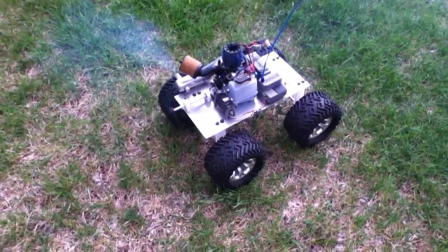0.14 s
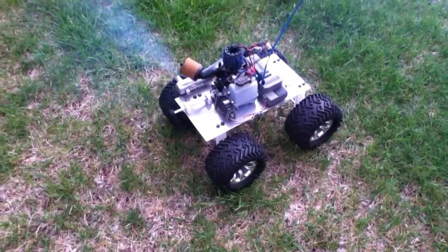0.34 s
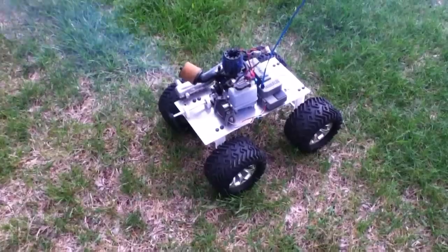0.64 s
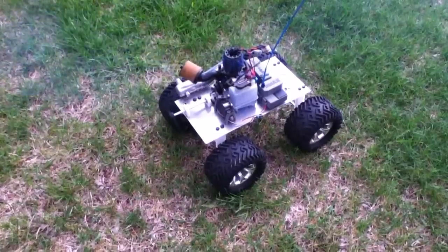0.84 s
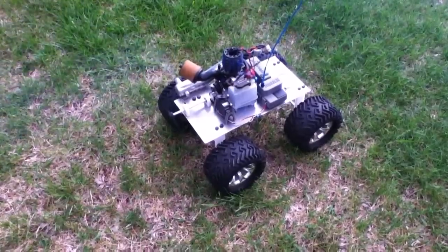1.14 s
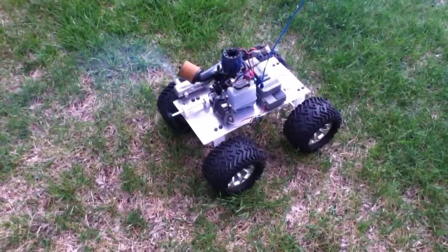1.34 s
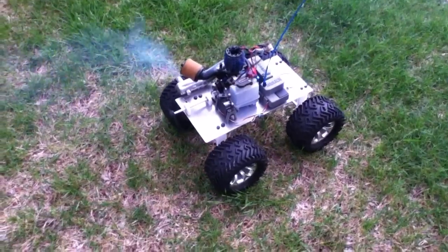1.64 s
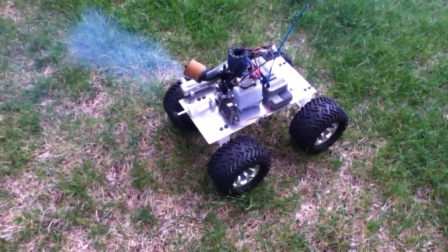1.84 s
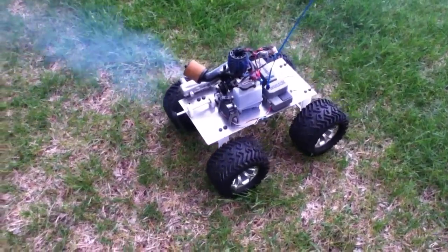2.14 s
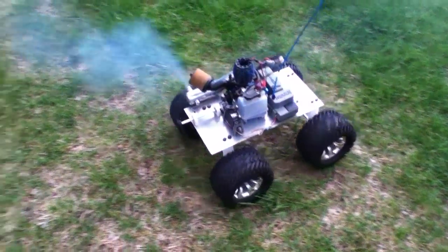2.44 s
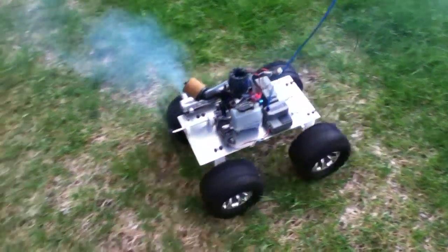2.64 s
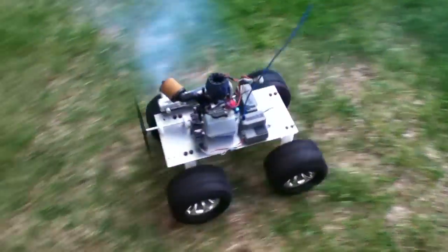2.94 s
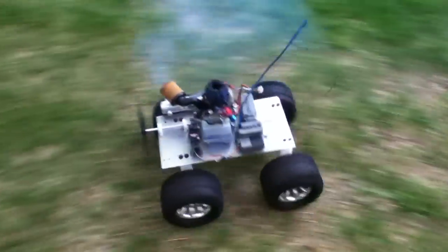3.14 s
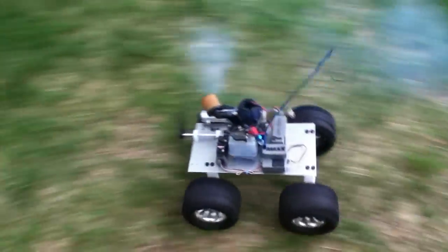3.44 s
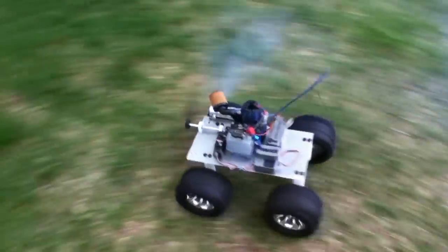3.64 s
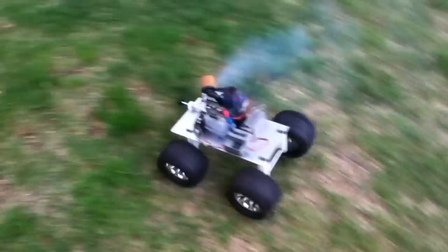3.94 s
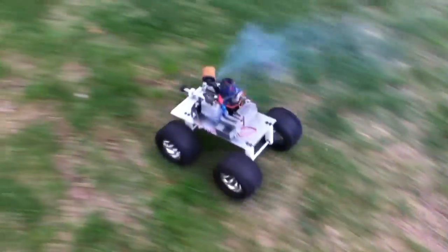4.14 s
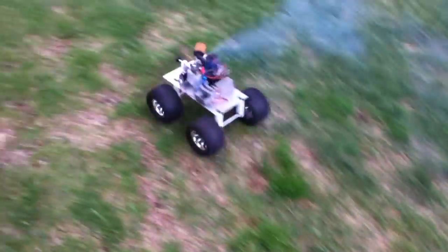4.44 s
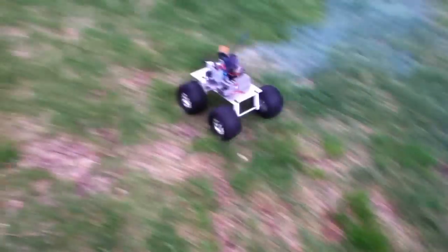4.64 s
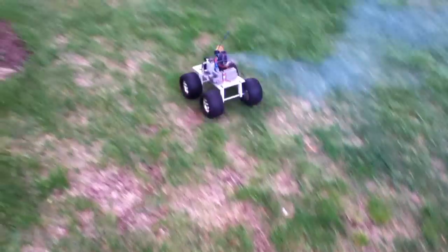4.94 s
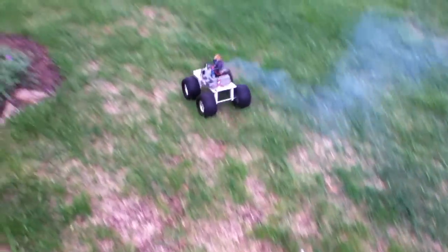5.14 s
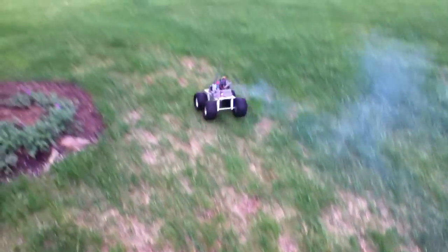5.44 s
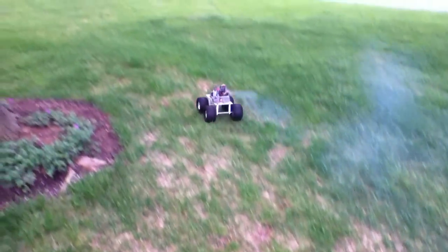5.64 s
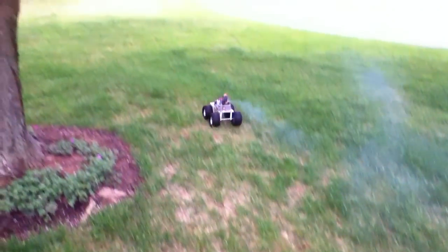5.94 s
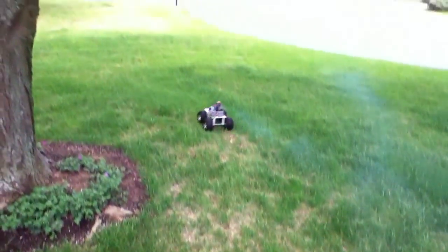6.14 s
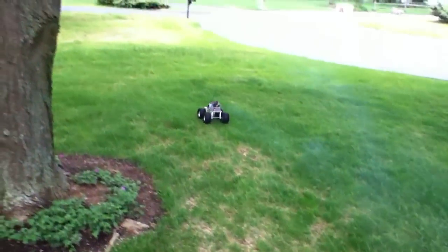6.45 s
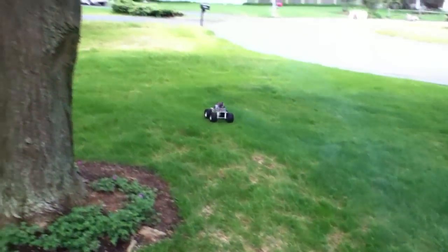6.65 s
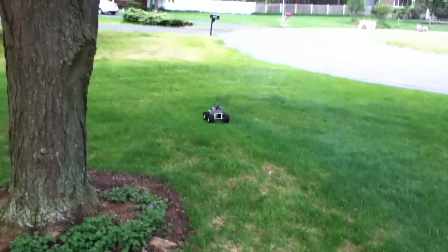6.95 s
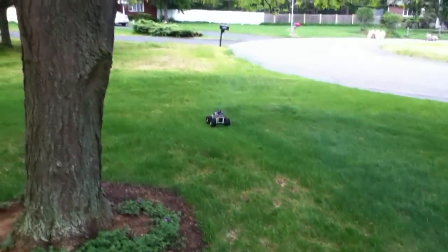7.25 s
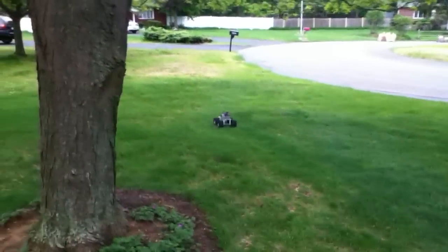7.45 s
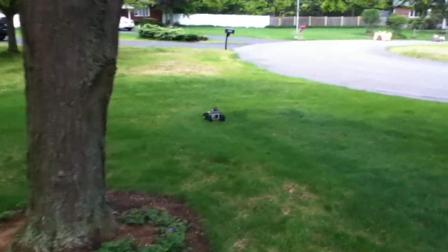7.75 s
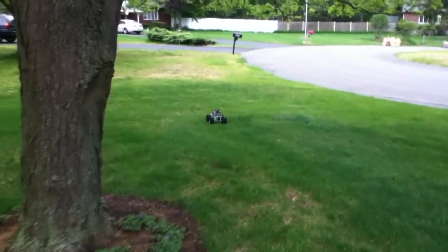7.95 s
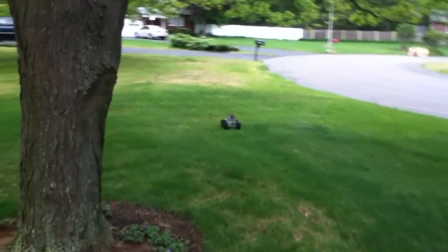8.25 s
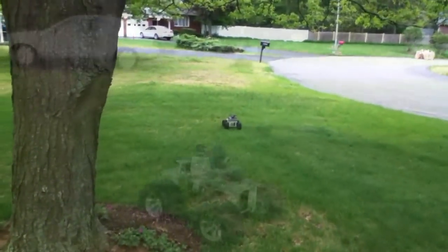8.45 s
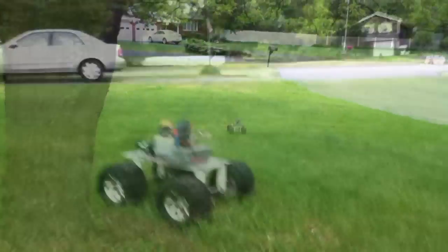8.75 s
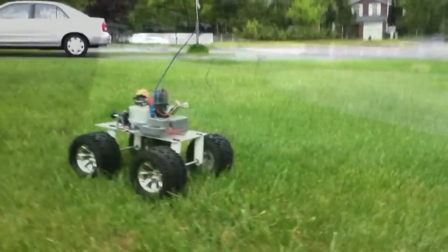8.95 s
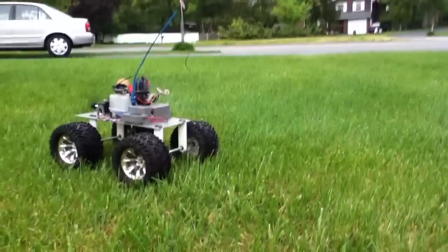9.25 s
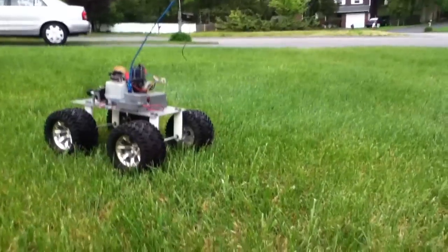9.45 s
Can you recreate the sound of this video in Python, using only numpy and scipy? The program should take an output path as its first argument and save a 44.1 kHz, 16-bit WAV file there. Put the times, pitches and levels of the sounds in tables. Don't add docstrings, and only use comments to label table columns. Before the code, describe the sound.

A high, nasal engine buzz with hissing gas and trembling metal plates starts close by, dips briefly, then climbs as the small model car pulls away over bumpy grass. The throttle snaps shut and a faint, uneven idle putters in the distance. A smooth fade brings a nearer view of the idle, clattering and uneven, over low outdoor rumble, essentially mono.

```python
import sys
import numpy as np
from scipy import signal
from scipy.fft import rfft, irfft, next_fast_len
from scipy.io import wavfile
from scipy.ndimage import uniform_filter1d

SR = 44100
rng = np.random.default_rng(int(sys.argv[2]) if len(sys.argv) > 2 else 0)


def linear_from_db(decibels):
    return 10 ** (np.asarray(decibels, float) / 20)


def dump_mix(stems):
    frames = np.atleast_2d(stems).T
    limited = np.clip(frames, -1, 1)
    pcm = np.round(limited * 32767).astype(np.int16)
    wavfile.write(sys.argv[1], SR, pcm)


N = 423360
TIME_S = np.arange(N) / SR

# time in seconds, open share (0 to 1).
THROTTLE = [
    (6.62, 1),
    (6.7, 0.56),
]
# time in seconds, then rasp, puff and hiss in dB
# over the rattle, and air in dB over the hiss.
ASPECTS = [(1.8, 1.5, -11, -9.5, -5), (2.8, -1, -12, -11, -7), (3.7, -3, -10.5, -9.5, -14),
           (4.3, -1.5, -10, -8, -19), (5.1, 0.5, -13.5, -8, -18), (6, 3.5, -14, -9, -18),
           (7.7, 3.5, -11, -7.5, -21), (9.2, 10, -13.5, -5, -16)]
# time in seconds, order 1 in dB, pipe peak over it in dB, pipe peak in Hz.
CLOSE_EXHAUST = [(8.5, -39.5, -7, 1480), (8.9, -31.5, -4.5, 1598), (9.2, -26.5, -3, 1840),
                 (9.6, -26.5, -6, 1896)]


def unit(x):
    return x / np.sqrt(np.mean(x ** 2) + 1e-20)


def along(points, hz):
    f, v = np.transpose(points)
    return np.interp(np.log(hz + 1), np.log(f + 1), v)


def curves(rows):
    s, *cols = np.transpose(rows)
    return [np.interp(TIME_S, s, c) for c in cols]


def wobble(rate, at=None):
    knots = rng.standard_normal(int(N * rate / SR) + 4)
    where = np.arange(N) if at is None else at
    return np.interp(where * rate / SR, np.arange(len(knots)), knots)


def coloured(x, level_db):
    m = next_fast_len(N + 8192)
    gain = linear_from_db(level_db(np.fft.rfftfreq(m, 1 / SR)))
    return unit(irfft(rfft(x, m) * gain, m)[:N])


def tinted(x, points):
    return coloured(x, lambda hz: along(points, hz))


def blend(x, share, first, second):
    return share * tinted(x, first) + (1 - share) * tinted(x, second)


def patch_field(shape, high, wide):
    smooth = uniform_filter1d(rng.standard_normal(shape), size=high, axis=0)
    return unit(uniform_filter1d(smooth, size=wide, axis=1))


def patchy(depth_db):
    z = signal.stft(rng.standard_normal(N + 512), nperseg=512)[2]
    z = z * linear_from_db(depth_db * patch_field(z.shape, 4, 16))
    return signal.istft(z, nperseg=512)[1][:N]


def shut():
    return np.interp(TIME_S, np.transpose(THROTTLE)[0], (0, 1))


def bumps(lag_s, size):
    # time of the deepest point in seconds, crank sag in Hz, length in seconds, drop of the noise in
    # dB (negative: a rise).
    turf = [(.19, 16, 0.19, -1), (0.362, 16, .09, -1), (0.52, 13, 0.13, -1.5), (0.917, 4, 0.097, 3),
            (1.43, 19, 0.13, -0.5), (1.589, 18, 0.22, 0), (1.746, 14, .06, 0.5), (1.93, 14, .09, -1.5),
            (2.049, 17, 0.098, 2.5), (2.137, 8, .08, 1), (2.351, 6, .12, -1), (2.451, 6, 0.084, -0.5),
            (2.871, 9, 0.13, 1.5), (3.089, 10, 0.13, -0.5), (3.282, 12, 0.17, 1.5), (3.446, 12, .16, 2),
            (3.678, 14, .18, 1.5), (4.493, 12, 0.2, 0.5), (4.67, 7, 0.13, 0.5), (5.001, 12, 0.15, 1),
            (5.13, 3, .14, 1.5), (5.291, 11, .18, -0.5), (5.577, 24, .3, 1.5), (5.759, 6, .12, 1),
            (5.96, 7, .14, 1.5), (6.059, 0, .1, 1.5), (6.249, 16, 0.23, 2), (6.439, 13, 0.082, 1),
            (6.569, 11, 0.11, 0.5), (7.397, 12, .1, 1.5), (8.991, 11, 0.065, 0.5)]
    sag_share = .32
    t = np.arange(0, N, 32) / SR - lag_s
    dips = 0
    for row in turf:
        corners_s = (-sag_share * row[2], 0, (1 - sag_share) * row[2])
        dips = dips + np.interp(t - row[0], corners_s, (0, row[size], 0))
    return np.repeat(dips, 32)[:N]


def crank(rows, exhaust, odd_idle_db, span_s):
    # frequency in Hz, gain in dB.
    outlet = [(900, 9), (1120, 1), (1250, 0), (1950, 1), (2200, -4), (2450, -1), (2700, -9), (3250, 7),
              (3800, 1), (4400, 9), (5100, 5), (5700, 8), (6400, -6)]
    # time in seconds, notch in Hz, depth in dB.
    ground = [(.2, 700, 2), (.42, 640, 0), (.6, 705, 3), (.75, 700, 11), (1.3, 696.7, 0.5),
              (2.6, 1001, 0.5), (3.8, 1050, 9), (4.5, 952, 10), (4.95, 730, 15.5), (5.5, 700, 19),
              (5.75, 705, 15), (6.05, 800, 13.5), (6.45, 839.5, 23), (6.7, 699, 1.5), (8.65, 500, 2.5),
              (8.9, 480.6, 12.5), (9.6, 481, 8)]
    # time in seconds, gain in dB.
    odd_orders = [(.6, 4.5), (.75, 1.5), (1.3, 2.5), (3.1, 3), (4.1, -1), (5.4, 2), (5.8, -1), (6.6, 3)]
    notch_width_hz = 275
    skirt = .11

    live = np.arange(round(span_s[0] * SR), min(round(span_s[1] * SR), N))
    slow = live[::32]
    turns = curves(rows)[0] - bumps(0, size=1)
    unsteady = 1.7 ** np.clip((345 - turns) / (345 - 230), 0, 1)
    turns = turns * (1 + unsteady * (.006 * wobble(30) + .007 * wobble(150)))
    angle = 2 * np.pi * np.cumsum(turns) / SR

    tracks = curves(exhaust) + curves(ground) + curves(odd_orders) + [turns, shut()]
    first_db, facing_db, peak_hz, notch_hz, notch_db, odd_db, hz, idle = np.array(tracks)[:, slow]
    low = {1: first_db}
    for k, over_first_db, soft_db in ((2, 4, -10), (3, 7.5, -16)):
        echo_db = notch_db / (1 + ((k * hz - notch_hz) / notch_width_hz) ** 2)
        low[k] = first_db + over_first_db + idle * soft_db - echo_db
    width_hz = 215 + 100 * idle
    tone = np.zeros(N)
    for k in range(1, 19):
        detune = (k * hz - peak_hz) / width_hz
        ring_power = linear_from_db(2 * facing_db) / (1 + detune ** 2) + skirt * (1 - .93 * idle)
        favour_db = (odd_db * (k < 6) + odd_idle_db * idle) * (k % 2 * 2 - 1)
        passed_db = first_db + 10 * np.log10(ring_power) + along(outlet, k * hz) + favour_db
        flutter_db = (1.1 + min(.05 * k, .3)) * wobble(40, slow)
        lag = np.arctan(detune) + np.pi / 2 + .6 * wobble(8, slow)
        size = np.interp(live, slow, linear_from_db(low.get(k, passed_db) + flutter_db))
        tone[live] -= np.sqrt(2) * size * np.cos(k * angle[live] - np.interp(live, slow, lag))
    return angle, tone


def four_stroking(angle):
    # order (multiple of the turning speed), level in dB over order 1.
    quarters = [(.75, -22), (1.25, -17), (1.5, -24), (1.75, -19), (2.25, -20)]
    first_db = curves(CLOSE_EXHAUST)[0]
    return sum(np.sqrt(2) * linear_from_db(first_db + db + 1.96 * wobble(15)) * np.sin(k * angle) for k, db in quarters)


def pops(angle, close):
    # frequency in Hz, level in dB.
    click_colour = [(500, -50), (1000, -37), (1800, 0.5), (4000, 7.0), (8000, -9.0), (12000, -48)]
    at = np.flatnonzero(np.diff(np.floor(angle / (2 * np.pi))))
    scatter_db = (5 - 2.5 * close[at]) * np.clip(rng.standard_normal(N // 64)[:len(at)], -2, 2)
    cycle_db = close[at] * np.array([9., -4, -3, 3])[np.arange(len(at)) % 4]
    strength = linear_from_db(scatter_db + cycle_db)
    clicks = np.zeros(N)
    clicks[at] = -strength
    clicks[np.minimum(at + 11, N - 1)] = .6 * close[at] * strength
    return tinted(clicks, click_colour)


def beat(angle, depth_db, lag, shake):
    return linear_from_db(depth_db * np.cos(angle - lag) + shake)


def rasp(angle, shake, close):
    # frequency in Hz, level in dB per Hz.
    usual_rasp = [(600, -92), (900, -10), (1200, -6), (1500, 4.5), (1800, 3), (2100, 1), (2500, -6),
                  (2900, -24.5)]
    high_rasp = [(900, -35), (1300, -6), (1700, 1.5), (1950, 3), (2300, 4.5), (2600, -10), (2900, -23)]
    close_rasp = [(700, -44), (900, -11), (1150, 0), (1600, 0), (2200, 4), (2450, -12), (2900, -22)]
    # time in seconds, share of the high rasp.
    end_on = [(.3, 0.19), (.9, 0), (1.2, 0), (2.15, 0), (2.4, 0.54), (2.9, .1), (3.3, 0.58), (4.1, 0.24),
              (4.35, 0.91), (4.9, 0.68), (5.15, 0.0046), (5.8, 0), (6.15, .7), (6.5, 0.44), (7.4, 0.22),
              (7.9, 0)]
    jet = beat(angle, 0.41, 0.99, shake) * patchy(0.73)
    far = blend(jet, np.clip(curves(end_on)[0], 0, 1), high_rasp, usual_rasp)
    return (close * tinted(jet, close_rasp) + (1 - close) * far) * linear_from_db(-2.5 * close)


def puff(angle, shake, throttle):
    # frequency in Hz, level in dB per Hz.
    open_puff = [(60, -36), (120, -15.5), (200, -12.5), (300, -4.5), (500, 3), (900, 6.5), (1200, 6.5),
                 (2000, -58)]
    idle_puff = [(60, 0), (150, -16), (300, 2.5), (450, -0.5), (620, -13), (850, -28), (1100, 6.5),
                 (2000, -33)]
    return blend(beat(angle, 0.69, 1.0, shake) * patchy(0.7), throttle, open_puff, idle_puff)


def turning(x):
    # frequency in Hz, level in dB per Hz.
    sides = [
        [(1530, -76), (2600, -5.5), (3270, -2), (4550, 0.5), (4980, -3), (5660, 3.5), (6650, -5.5),
         (8010, -1.5), (9300, -7.5), (12100, -70)],
        [(1530, -58), (2600, -11.5), (3270, -4.5), (3900, -8), (4380, -1), (4930, -10), (5760, -3.5),
         (6330, -11.5), (8230, -7), (12100, -25)],
        [(1530, -36), (2600, -6), (3220, -3.5), (3860, 1.5), (4360, -4), (5040, 1.5), (7120, -1.5), (8010, 3),
         (9300, -5.5), (12100, -19)],
        [(1530, -26), (2600, -11), (3050, -2), (5060, -4.5), (5490, -1), (7090, -5.5), (8010, 0), (9300, -1.5),
         (12100, -17)],
        [(1530, -52), (2600, -13), (3150, -4.5), (3800, -3.5), (4070, -8), (5060, -6.5), (6330, -12.5),
         (8010, -5.5), (9300, -20), (12100, -37)],
        [(1530, -24.5), (2600, 0.5), (3560, -1), (4550, 1), (5370, -3), (6610, -2), (7550, -4.5), (9300, -10),
         (12100, -38)],
    ]
    tail = [(1470, -41), (2500, -12), (3210, 1), (4640, -2.5), (5080, -2), (6860, -5.5), (7080, -8),
            (8250, -4.5), (11500, -20), (15000, -42), (22000, -120)]
    leaving = [(1470, -37), (2500, -13), (2660, -10), (3250, -7), (3570, -5), (4730, -3), (7080, -4.5),
               (8850, -3), (11500, -16), (15000, -42), (22000, -120)]
    in_order = sides[:2] + [tail, sides[2], leaving] + sides[3:]
    place = np.interp(TIME_S, np.transpose(ASPECTS)[0], np.arange(len(ASPECTS)))
    total = 0
    for i, side in enumerate(in_order):
        facing = np.clip(1 - abs(place - i), 0, 1)
        total = total + facing * tinted(x, side + [(20500, -120)])
    return total


def plates():
    # pitch in Hz, width in Hz, level in dB over the rattle, start and end in seconds.
    singing = [(3246, 57, -14.5, 2.3, 4.4), (3250, 180, -15, -1.5, 2.2), (7730, 75, -17, 4, 5.5),
               (4470, 48, -14.5, 5, 4.8), (5130, 88, -11, 6, 6.62), (6740, 126, -14, 4.5, 8.8),
               (3714, 72, -12, 5.5, 6), (5700, 99, -17, 1.5, 3.5), (3830, 57.5, -17, 4.5, 4.5),
               (8190, 160, -10, 3, 4.8), (5200, 160, -15, 3, 4.4), (5760, 150, -13, 4.85, 5.05),
               (3350, 101, -19, 7, 8.3)]
    total = 0
    for centre_hz, width_hz, db, start, end in singing:
        peak = signal.iirpeak(centre_hz, centre_hz / width_hz, SR)
        ring = signal.lfilter(*peak, rng.standard_normal(N))
        ring = unit(signal.lfilter(*peak, ring))
        fade = np.clip(np.minimum(TIME_S - start, end - TIME_S) / 0.085 + 1, 0, 1)
        total = total + linear_from_db(db) * ring * fade
    return total


def rattle(angle, shake):
    shaken = beat(angle, 1.3, 1.8, shake) * patchy(1.0) * linear_from_db(0.96 * wobble(50))
    return turning(shaken) + plates()


def hiss(angle, shake, air_db):
    # frequency in Hz, level in dB per Hz.
    gas_colour = [(8000, -38), (9000, -1.5), (10700, -0.5), (11500, -6.5), (12500, -5.5), (13300, -9),
                  (13800, -24), (15700, -26)]
    air_colour = [(13100, -24), (13700, -5), (14200, 1), (15000, 5), (15700, -5)]
    gas = beat(angle, 2.4, 2.2, shake) * patchy(1.0) * linear_from_db(1.3 * wobble(60))
    return tinted(gas, gas_colour) + linear_from_db(air_db) * tinted(gas, air_colour)


def roar(angle, close):
    # time in seconds, level in dB.
    loudness = [(0, -15.5), (.64, -17.5), (.88, -15.5), (1.09, -15), (1.4, -17), (1.98, -16), (2.6, -15.5),
                (3.56, -15), (3.9, -16), (4.2, -14.5), (4.92, -15), (5.5, -17), (6.62, -19.5),
                (6.76, -25.5), (6.94, -30), (7.0, -26), (8.58, -28), (9.17, -20)]
    throttle_cut = [
        (6.65, 0),
        (6.67, -4),
        (6.77, 0),
    ]
    outlet_swing = [(0, -1), (1.25, -1.5), (1.7, -1), (2.1, 0), (2.45, 0), (2.75, -1), (2.95, 1.5),
                    (3.5, 3), (3.9, 2.5), (4.35, 1), (4.7, -1), (5.1, -0.5), (5.3, -1.5), (5.5, -0.5),
                    (5.9, -2), (6.15, 0.5), (6.35, 2), (6.6, 2.5), (7.1, -1), (7.4, 1.5), (7.9, 0),
                    (8.5, -4.5), (8.7, -1), (9.1, 0), (9.6, -1.5)]
    level_db = curves(loudness)[0]
    falter_db = bumps(0.012, size=3)
    rasp_db, puff_db, hiss_db, air_db = curves(ASPECTS)
    rasp_db = level_db + rasp_db - 1.7 * falter_db + curves(throttle_cut)[0]
    rasp_db = rasp_db + curves(outlet_swing)[0] + 0.26 * wobble(7.9)
    puff_db = level_db + puff_db + 3.5 * shut() - falter_db + 1.0 * wobble(7.7)
    rattle_db = level_db - falter_db
    hiss_db = level_db + hiss_db - 3.5 * shut() - 1.3 * falter_db + 0.96 * wobble(8)
    throttle = np.clip(curves(THROTTLE)[0], 0, 1)
    pops_db = rasp_db - 12 - 6 * throttle
    shake = 0.18 * wobble(13) + 0.26 * wobble(45) + 0.77 * wobble(130)
    return (linear_from_db(rasp_db - 6.5) * rasp(angle, shake, close)
            + linear_from_db(puff_db - 4.0) * puff(angle, shake, throttle)
            + linear_from_db(rattle_db - 0.39) * rattle(angle, shake)
            + linear_from_db(hiss_db - 2.0) * hiss(angle, shake, air_db)
            + linear_from_db(pops_db) * pops(angle, close))


def clutch():
    # time in seconds, turns per second in Hz, hum in dB, whine in dB.
    shaft = [(2.6, 263, -70, -70), (3, 261, -58, -43), (3.4, 245.4, -63, -44), (4.4, 260, -60, -37.5),
             (4.9, 263.4, -65, -41.5), (5.65, 246.5, -57, -43), (5.85, 245.5, -60, -55),
             (6.03, 250, -60, -36), (6.17, 226.4, -49, -43), (6.3, 218, -46, -49), (6.75, 203, -49, -56)]
    hz, hum_db, whine_db = curves(shaft)
    angle = 2 * np.pi * np.cumsum(hz * (1 + 0.0059 * wobble(25))) / SR
    whine = linear_from_db(-7) * np.sin(2 * angle) + np.sin(3 * angle)
    orders = linear_from_db(hum_db) * np.sin(angle) + linear_from_db(whine_db) * whine
    engaged = np.interp(TIME_S, (7.5, 6.84), (1, 0))
    return np.sqrt(2) * linear_from_db(6.9 * wobble(14)) * orders * engaged


def lawn():
    # frequency in Hz, level in dB per Hz.
    rumble_colour = [(15, -43), (25, -13), (70, 4), (162, -0.5), (180, 8.5), (230, -27), (400, -120)]
    # time in seconds, level in dB.
    rumble_level = [(0, -59), (.85, -55), (1.1, -53), (3.3, -61), (5.5, -58.5), (7.5, -53), (9.6, -47.5)]
    swell_db = 3 * wobble(9)
    rumble = tinted(rng.standard_normal(N), rumble_colour)
    return linear_from_db(curves(rumble_level)[0] + 1.5 + swell_db) * rumble


def scene():
    # time in
    # seconds, turns per second in Hz.
    far_speed = [(0, 312.2), (.56, 323.5), (.635, 314.7), (.7, 265.7), (1.06, 282.6), (1.28, 312.3),
                 (1.52, 308.2), (1.8, 299.6), (2.0, 318), (2.2, 328.3), (2.6, 349), (2.83, 356), (3.35, 343.4),
                 (3.58, 359.4), (3.8, 348.8), (4.9, 360.3), (5.44, 351.7), (6.02, 345.8),
                 (6.09, 301.8), (6.15, 309), (6.48, 311.3), (6.62, 301.5), (6.7, 236), (6.75, 222.5),
             (6.94, 210), (7.0, 236.8), (7.15, 233.3), (7.3, 240), (7.45, 232.7), (7.56, 236.8),
             (7.7, 227.6), (7.95, 225.8), (8.05, 230), (8.15, 221.5), (8.3, 222.6), (8.45, 229),
             (8.55, 218.4), (8.85, 220)]
    close_idle = [(8.45, 236.3), (8.8, 239.7), (8.85, 234.2), (9.06, 239.4), (9.32, 232.2), (9.49, 243),
                  (9.6, 244)]
    # time in seconds, order 1 in dB, pipe peak over it in dB,
    # pipe peak in Hz.
    far_exhaust = [(.55, -30.5, 3, 1610), (.75, -32, 1.5, 1440), (1.2, -30, 7, 1600), (1.7, -32, 5.5, 1557),
                   (2.0, -31, 6, 1580), (2.6, -29.5, 4.5, 1640), (3.3, -31, 6.5, 1721),
                   (3.52, -31, 7, 2125), (3.75, -27.5, 5.5, 1950), (4.15, -27, -3, 2150),
                   (4.35, -27.5, -4, 1900), (4.5, -27.5, -2, 1785), (4.72, -28.5, -4, 1750),
                   (4.95, -28.5, -1, 1420), (5.2, -30.5, 3, 1500), (5.4, -30, 6, 1707),
                   (5.8, -31, 9.5, 1757), (6.15, -33, 8.5, 1780), (6.3, -30.5, 5, 1860),
                   (6.5, -29, 5.5, 1852), (6.63, -37, 8, 1797), (6.68, -40.5, -6, 1283),
                   (7, -36.5, -9, 1303), (7.4, -39, -6.5, 1448), (7.9, -36, -8, 1505),
                   (8.3, -34.5, -7, 1558)]
    far_angle, far_tone = crank(far_speed, far_exhaust, odd_idle_db=5.5, span_s=(0, 9))
    near_angle, near_tone = crank(close_idle, CLOSE_EXHAUST, odd_idle_db=1.5, span_s=(8.2, 10))
    close = np.interp(TIME_S, (8.5, 8.76), (0, 1))
    angle = np.cumsum((1 - close) * np.gradient(far_angle) + close * np.gradient(near_angle))
    near_tone = near_tone + four_stroking(near_angle)
    tone = np.cos(close * np.pi / 2) * far_tone + np.sin(close * np.pi / 2) * near_tone
    mono = tone + roar(angle, close) + clutch() + lawn()
    return np.array([mono, mono])


def dropouts(x):
    # time in seconds, rarity of the patches (higher is rarer).
    rarity = [(0, 2), (2.7, 1.9), (3.1, 1.3), (4, 1.7), (4.6, 1.2), (5.2, .9), (6.4, .8), (7.1, 1.3),
              (7.3, 1.9), (7.6, 1.2), (8.4, 1.3), (8.8, 3)]
    band_hz = (13300, 14800)
    hz, t, z = signal.stft(x, SR, nperseg=1024)
    field = patch_field(z.shape[1:], 7, 5)
    off_centre = abs(hz - np.mean(band_hz)) / np.ptp(band_hz)
    muted = field > np.interp(t, *np.transpose(rarity)) + 4 * off_centre[:, None] ** 2
    gain = linear_from_db(-32 * muted * (off_centre < 1)[:, None])
    return signal.istft(z * gain, SR, nperseg=1024)[1][:, :N]


def low_pass(x):
    return signal.sosfilt(signal.butter(12, 17040, fs=SR, output="sos"), x)


def record(dry):
    # from Hz, to Hz, level in dB, rarity.
    leaks = [(2290, 2900, -20.5, 0.72), (2930, 3800, -9.5, 0.83), (5399, 6100, -8.5, 0.77),
             (8194, 10400, -5, 2.107), (13800, 15700, -13, 2.4)]
    # frequency in Hz, gain in dB.
    mic = [(30, -15), (140, -0.5), (13000, -1), (13900, -4), (14800, 0.5)]
    level = np.sqrt(np.abs(uniform_filter1d(dry[0] ** 2, size=2048)))
    side = 0
    for lo, hi, db, rare in leaks:
        band = coloured(rng.standard_normal(N), lambda hz: -120. * ((hz < lo) | (hz > hi)))
        gate = uniform_filter1d(1. * (wobble(40) > rare), size=300)
        side = side + linear_from_db(db - 8.0) * level * band * gate
    eased = dry / (1 + abs(dry / .95) ** 4) ** (1 / 4)
    both = eased + np.array([side, -side])
    hz = np.fft.rfftfreq(N, 1 / SR)
    kept = irfft(rfft(both) * linear_from_db(along(mic, hz)) * (hz < 15750), N)
    mix = dropouts(kept)
    return low_pass(mix)


dry = scene()
out = record(dry)
dump_mix(out)
```